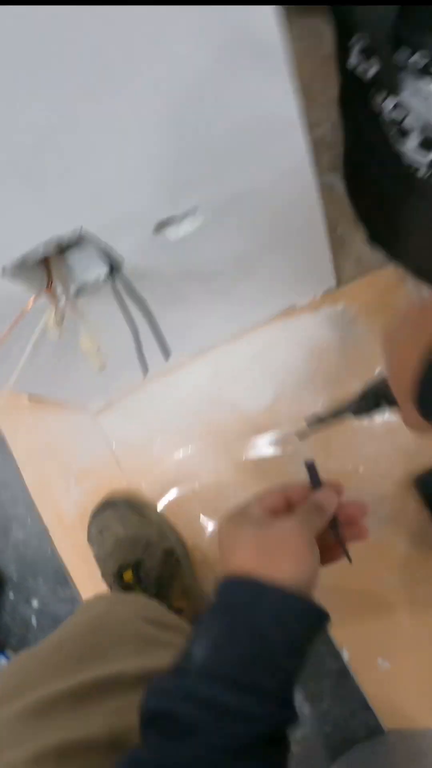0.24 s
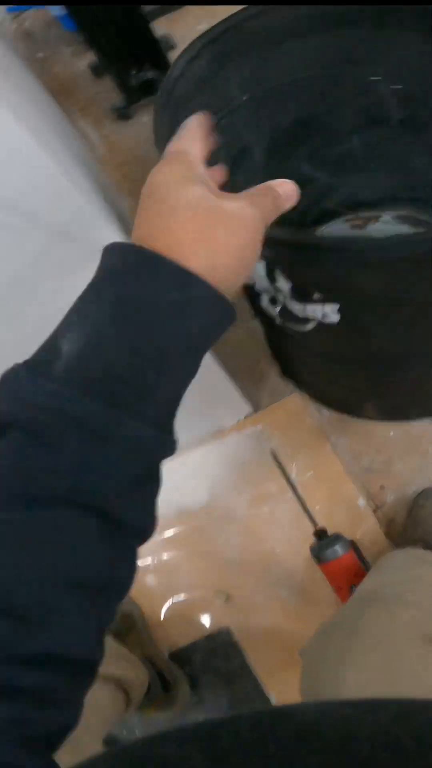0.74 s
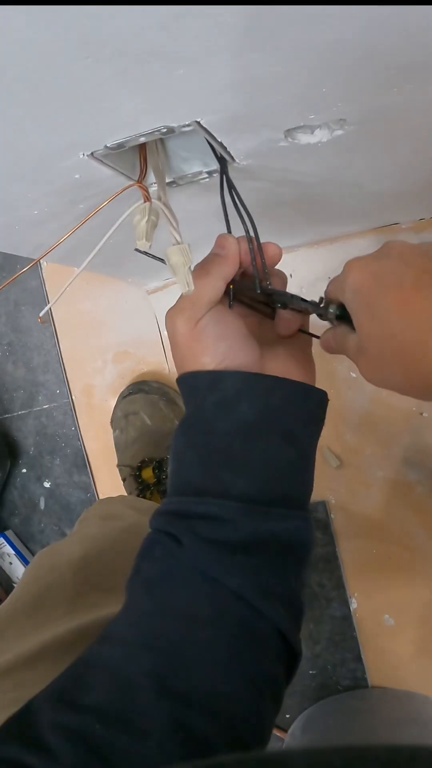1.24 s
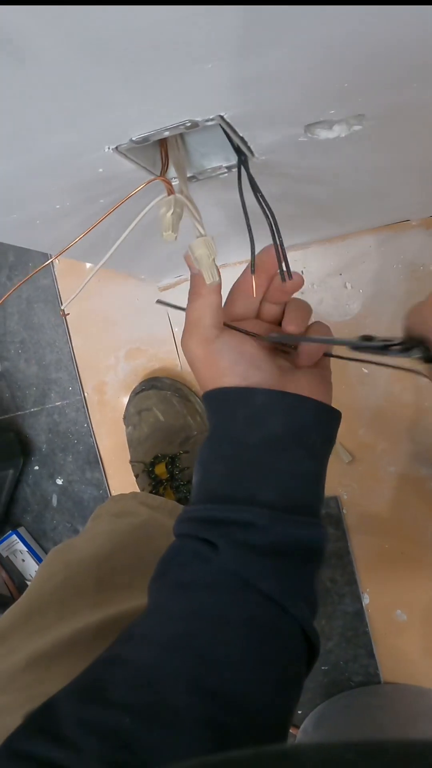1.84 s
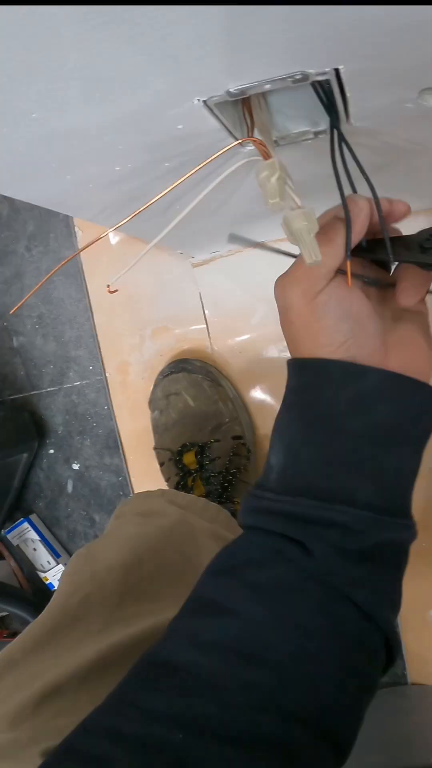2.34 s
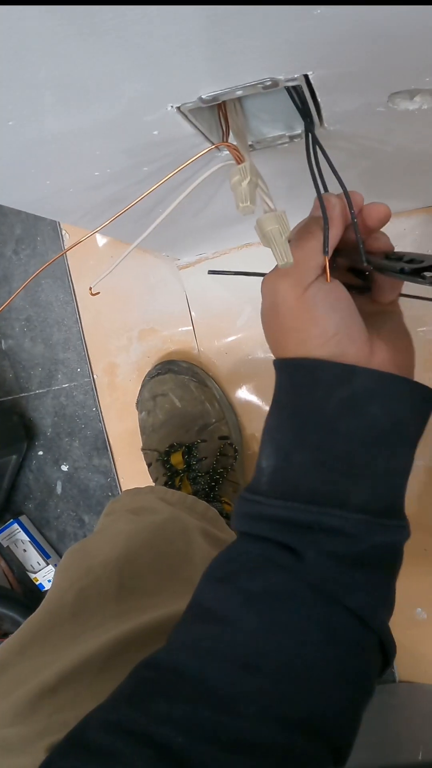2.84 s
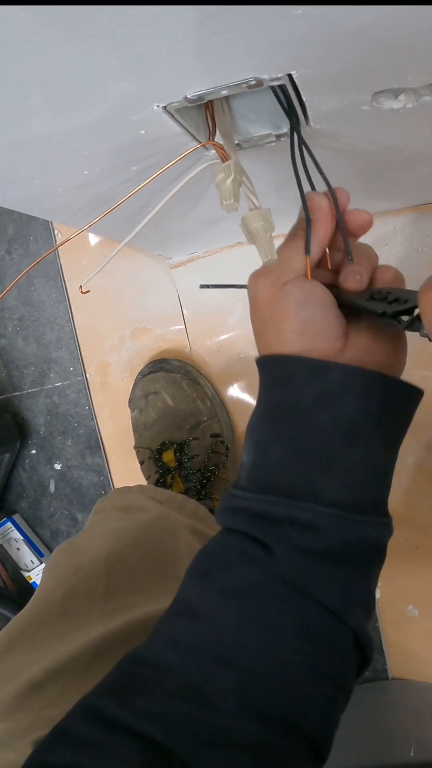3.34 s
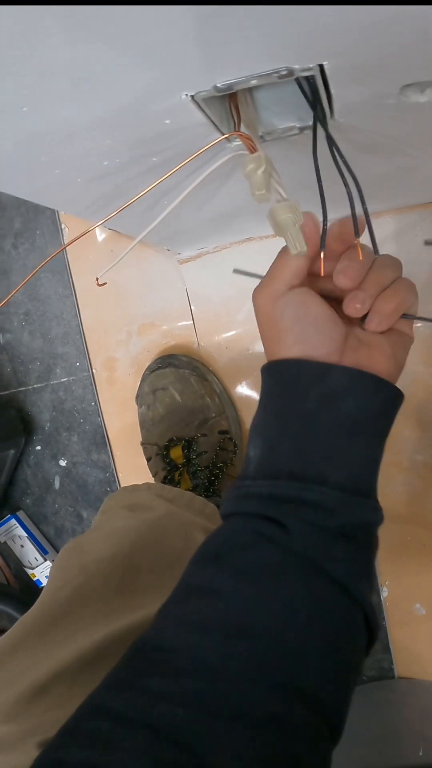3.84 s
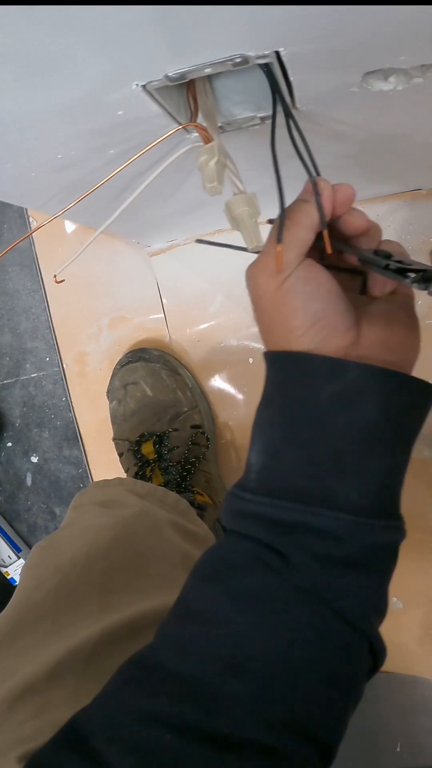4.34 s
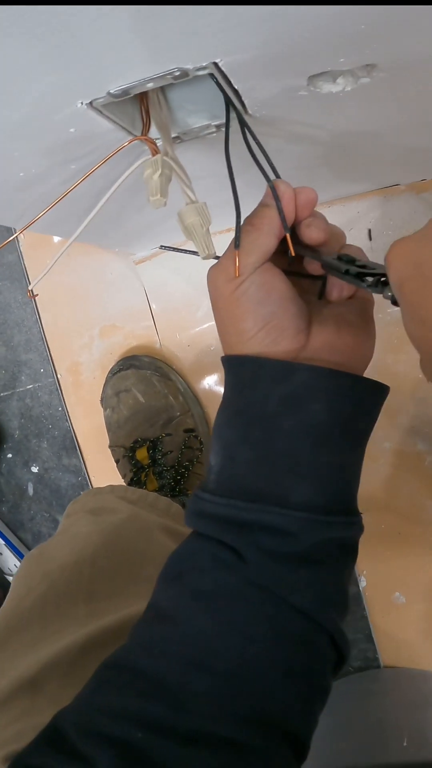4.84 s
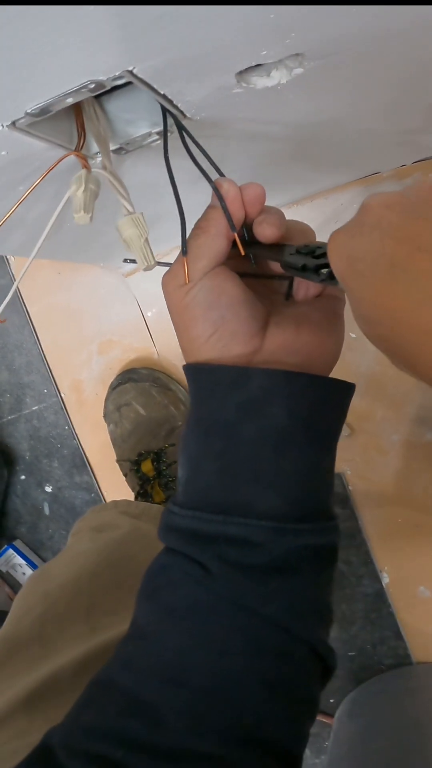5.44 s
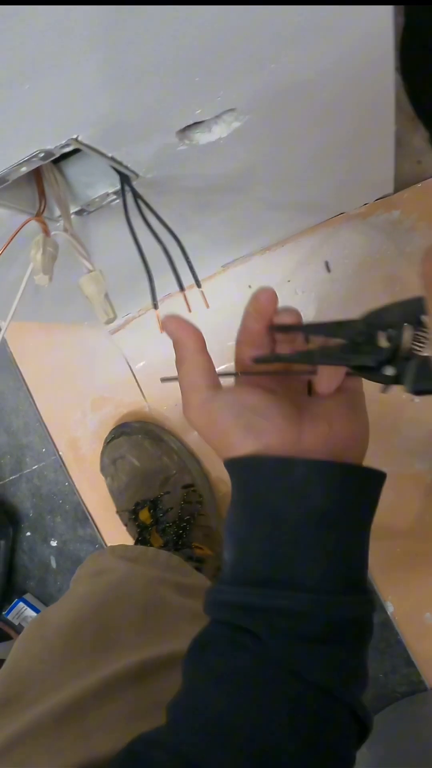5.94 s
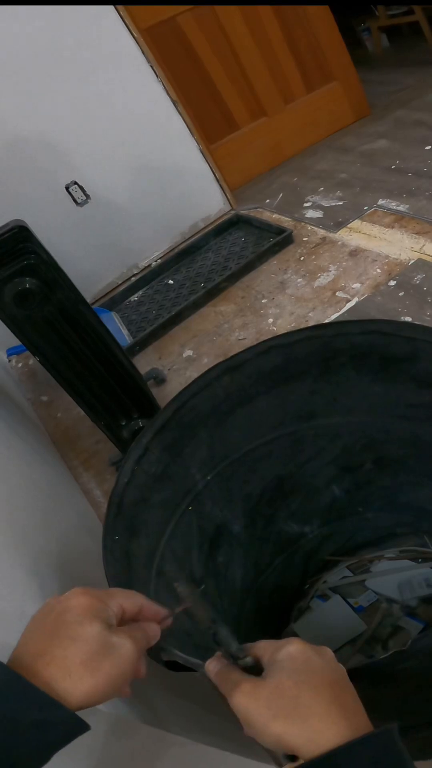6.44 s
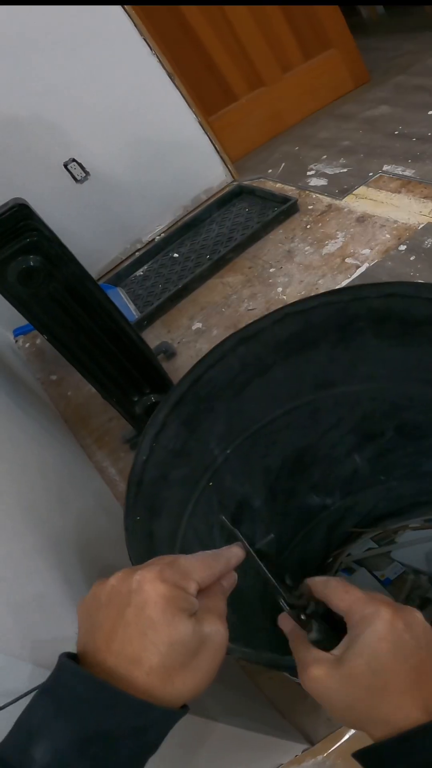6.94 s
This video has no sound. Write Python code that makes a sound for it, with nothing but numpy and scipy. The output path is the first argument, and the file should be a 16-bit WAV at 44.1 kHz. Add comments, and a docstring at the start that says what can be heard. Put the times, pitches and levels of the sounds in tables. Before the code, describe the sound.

Heard close up indoors, wire strippers cut and work stiff wire. One bright snip opens, then rustling and small clicks, a second snip with clacking handles, padded knocks, and a stronger third snip. Insulation ticks and parts with two brief snaps before a final ringing snip. Bare walls give each blow a lively echo until it suddenly vanishes; afterwards only quiet rubbing and sparse dry clicks remain.

```python
"""Wire strippers snip and strip insulated copper wire at a wall box, heard close up in a bare room.
A snip opens the scene, with two more near 1.6 and 3.4 s: noise cracks, a short jaw ring and a handle thump.
Throughout, filtered noise makes sleeves rustle and insulation scrape; taps and catches punctuate it.
Two dry snaps follow near 4.5 s and a last snip at 5.6 s; its room echo stops abruptly at 5.955 s.
Only close, dry handling and light clicks remain after that, over a quiet bed of air noise."""
import sys
import numpy as np
from scipy import signal
from scipy.fft import rfft, irfft, next_fast_len
from scipy.io import wavfile
from scipy.ndimage import uniform_filter1d, map_coordinates

SR = 44100
rng = np.random.default_rng(int(sys.argv[2]) if len(sys.argv) > 2 else 0)


def wav_out(sig):
    """Save sig, one row per channel (or a flat mono array), as 16-bit PCM at SR to the path in sys.argv[1]."""
    wavfile.write(sys.argv[1], SR, np.round(np.clip(np.atleast_2d(sig).T, -1, 1) * 32767).astype(np.int16))


N = 317462

# Spectral shape of soft, low cloth noise. Each row: frequency in Hz, relative level in dB.
SLEEVE_SPECTRUM = [(30, -45.5), (95, -33), (140, -7.5), (180, 3), (280, 0.5), (380, -9), (700, -21.5),
                   (1100, -8.5), (1600, -31), (5000, -74.5)]
# Spectral shape of insulation catching on steel. Each row: frequency in Hz, relative level in dB.
INSULATION_SPECTRUM = [(500, -18.5), (1500, 2.5), (2500, 1.5), (4500, -4.5), (7000, -7.5), (9000, -19.5),
                       (11000, -13.5), (14000, -24)]


def amp(db):
    """Decibels to gain."""
    return 10 ** (np.asarray(db) / 20)


def unit(x):
    """Scale to rms 1."""
    return x / np.sqrt(np.mean(x ** 2) + 1e-20)


def crest(x, size):
    """Scale so that the loudest stretch of size samples has rms 1."""
    return x / np.sqrt(uniform_filter1d(x ** 2, size).max() + 1e-20)


def along(points, hz):
    """Read (Hz, value) points on a log frequency axis."""
    f, v = np.transpose(points)
    return np.interp(np.log(hz + 1), np.log(f + 1), v)


def wobble(rate):
    """A smooth random curve with rate knots a second."""
    knots = rng.standard_normal(int(N * rate / SR) + 4)
    return map_coordinates(knots, [np.arange(N) * rate / SR])


def coloured(x, spectrum):
    """Causal (minimum-phase) filter with the given spectrum in dB."""
    n = x.shape[-1]
    m = 2 * next_fast_len(n // 2 + 2048)
    cepstrum = irfft(np.log(amp(along(spectrum, np.fft.rfftfreq(m, 1 / SR)))))
    # folding the cepstrum onto positive time gives minimum phase
    cepstrum[1:m // 2] *= 2
    cepstrum[m // 2 + 1:] = 0
    return irfft(rfft(x, m) * np.exp(rfft(cepstrum)), m)[..., :n]


def noise_in(spectrum):
    """Steady noise of rms 1 with the given spectral shape."""
    return unit(coloured(rng.standard_normal(N), spectrum))


def add(track, s, sound):
    """Mix a sound into the track at time s, in seconds."""
    part = track[max(round(s * SR), 0):][:len(sound)]
    part += sound[:len(part)]


def strike(t, attack, t60):
    """Envelope of a contact: force builds over the attack, then the vibration dies by 60 dB in t60."""
    rise = np.sin(np.pi / 2 * np.minimum(t / attack, 1)) ** 2
    return rise * amp(-60 * np.maximum(t - attack, 0) / t60)


def burst(t, attack, t60):
    """Noise under a contact envelope, as from a volley of tiny fractures."""
    return rng.standard_normal(len(t)) * strike(t, attack, t60)


def air(level_db=-57.5):
    """A low bed of noise whose level wanders slowly."""
    # Spectral shape of the air bed. Each row: frequency in Hz, relative level in dB.
    air_spectrum = [(25, -11.5), (45, -20.5), (100, -20.5), (150, -4.5), (200, -0.5), (280, -5), (400, -4),
                    (600, -3), (900, -11), (1300, -11.5), (2000, -12.5), (4000, -26), (7000, -35),
                    (11000, -36.5), (14000, -48.5)]
    return amp(level_db + 0.68 * wobble(1.2)) * noise_in(air_spectrum)


def handling(catch_rate=90, catch_db=-9, sleeve_flutter_db=1.5, scrape_flutter_db=2.5, scrape_gain_db=-2.0):
    """Sleeves rustle; fingers and steel rub the insulation with scattered tiny catches."""
    # Level points of continuous handling noise, in three lists that are joined.
    # Each row: time in seconds, sleeve level in dB before flutter,
    # scrape level in dB before flutter and scrape_gain_db.
    level_points = [
        [(0.9, -62.5, -59.5), (1.01, -55, -53.5), (1.16, -54.5, -52.5), (1.57, -50.5, -52), (2.01, -56, -63),
         (2.29, -59, -62), (2.43, -55, -56), (2.89, -57, -63), (3.32, -53, -57.5)],
        [(3.85, -57.5, -60), (4.088, -57.5, -59.5), (4.378, -55, -57), (4.55, -53.5, -52.5),
         (4.654, -54.5, -62.5), (5.026, -52, -59), (5.388, -56, -63.5), (5.56, -52.5, -66.5)],
        [(5.97, -53, -63.5), (6.028, -76, -66), (6.202, -65, -64), (6.458, -64.5, -63), (6.594, -66, -65),
         (6.724, -66, -74), (6.93, -65, -64), (7.122, -60, -59), (7.199, -68, -62)],
    ]
    # Spectral shape of the rubbing. Each row: frequency in Hz, relative level in dB.
    scrape_spectrum = [(150, -29.5), (450, 0), (800, 1.5), (1080, 4.5), (1500, 3.5), (2400, -0.5),
                       (4400, -5.5), (7000, -12), (9000, -22), (11000, -13.5), (13500, -26.5)]
    s, *levels = np.vstack(level_points).T
    sleeve_db, scrape_db = [np.interp(np.arange(N) / SR, s, level) for level in levels]
    sleeve = noise_in(SLEEVE_SPECTRUM) * amp(sleeve_db + sleeve_flutter_db * wobble(30))
    rub = noise_in(scrape_spectrum) * amp(scrape_flutter_db * wobble(29))
    # catch_rate is the average number of catches per second
    impulses = (rng.random(N) < catch_rate / SR) * rng.standard_normal(N)
    catches = unit(coloured(impulses, INSULATION_SPECTRUM))
    return sleeve + (rub + amp(catch_db) * catches) * amp(scrape_db + scrape_gain_db)


def swells(flutter_db=2):
    """Soft low noise swells and fades after the last three loud cracks."""
    # Soft swells. Each row: start in seconds, length in seconds, peak level in dB before flutter.
    swell_times = [(3.443, 0.38, -43), (4.557, .22, -48), (5.588, 0.33, -43.5)]
    level = np.zeros(N)
    for s, length, db in swell_times:
        add(level, s, amp(db) * signal.windows.hann(round(length * SR)))
    return level * amp(flutter_db * wobble(30)) * noise_in(SLEEVE_SPECTRUM)


def rustles(flutter_db=1.5, rise_s=.002):
    """Short rustles of rubbing noise start almost at once and die away unevenly."""
    # Short rustles. Each row: start in seconds, level in dB before flutter, 60 dB decay in seconds.
    rubs = [(0.993, -48, 0.88), (4.0, -54, .4), (1.19, -54.5, 0.71), (2.33, -58, .5), (3.14, -57, 0.69),
            (6.5, -60, 0.74), (6.92, -56, 1.5)]
    # Spectral shape of the rustle. Each row: frequency in Hz, relative level in dB.
    rustle_spectrum = [(200, -10), (600, -3), (1100, 0.5), (2500, -1), (4500, -1.5), (7000, -11.5),
                       (9000, -20.5), (11000, -17.5), (14000, -29.5)]
    level = np.zeros(N)
    t = np.arange(SR) / SR
    for s, db, t60 in rubs:
        add(level, s, amp(db) * strike(t, rise_s, t60))
    return level * amp(flutter_db * wobble(40)) * noise_in(rustle_spectrum)


def drags(jitter=0.097):
    """Insulation sticks and slips through the notch: quick decaying noise bursts make a thin buzz."""
    # The notch drags along the insulation.
    # Each row: start in seconds, end in seconds, mean slips per second, level in dB.
    strokes = [(3.265, 3.285, 260, -57.5), (4.956, 5.018, 210, -60)]
    buzz_spectrum = [(1500, -7), (4000, -4), (7000, 12), (9000, -20), (14000, -23)]  # (Hz, dB)
    out = np.zeros(N)
    for start, end, rate, db in strokes:
        n = round((end - start) * SR)
        phase = np.cumsum(rate * (1 + jitter * wobble(80)[:n])) / SR
        slips = rng.standard_normal(n) * np.exp(-6 * (phase % 1))
        buzz = unit(coloured(slips, buzz_spectrum)) * signal.windows.tukey(n)
        add(out, start, amp(db) * buzz)
    return out


def ticks(scatter_db=2.0, t60=0.0114):
    """During each pull the insulation catches on the steel with small dry ticks, unevenly spaced."""
    # The notch works along stiff insulation.
    # Each row: start in seconds, end in seconds, ticks per second, level in dB before random scatter.
    pulls = [(1.219, 1.56, 38, -47.5), (4.56, 4.97, 50, -52), (5.038, 5.12, 50, -48.5),
             (5.27, 5.41, 22, -52.5), (6.969, 7.1, 25, -53)]
    out = np.zeros(N)
    t = np.arange(SR // 30) / SR
    for start, end, rate, db in pulls:
        for s in np.arange(start, end, 1 / rate):
            tick = crest(coloured(burst(t, 0.00036, t60), INSULATION_SPECTRUM), size=88)
            tick_db = db + scatter_db * rng.standard_normal()
            add(out, s + rng.random() / rate, amp(tick_db) * tick)
    return out


def ringing(t, hz, attack, t60, waver=0.33):
    """One hand-damped mode; the grip shifts, so its phase drifts."""
    # waver is the rms phase drift in radians per square root of a millisecond
    drift = waver * np.cumsum(rng.standard_normal(len(t))) / np.sqrt(SR / 1000)
    return crest(np.sin(2 * np.pi * hz * t + drift) * strike(t, attack, t60), size=132)


def contact(hz, attack, t60, thump_db, ring_db, crack_db, tick_db,
            thump_t60=0.049, release=20, ring_life=1.77, ring_lag=0.0011):
    """One contact: a push on the handles, a short ring of the jaws, a crack and a bright tick."""
    # Spectral shape of hand and handles. Each row: frequency in Hz, relative level in dB.
    thump_spectrum = [(30, -47), (70, -29.5), (100, -21), (128, -7.5), (175, 5), (215, -6), (268, 1.5),
                      (370, -18.5), (650, -24), (1000, -44.5), (3000, -100)]
    # Spectral shape of the crack. Each row: frequency in Hz, relative level in dB.
    crack_spectrum = [(200, -56), (450, -21.5), (900, -4), (1400, -2), (2000, -0.5), (2800, -0.5),
                      (3400, -5), (4200, -7), (5500, -11.5), (9000, -52.5)]
    # Spectral shape of the bright tick. Each row: frequency in Hz, relative level in dB.
    tick_spectrum = [(2000, -49.5), (3800, -8), (5100, 3), (6500, 3), (8000, -5.5), (11000, -1.5),
                     (13000, -2.5), (15000, -22.5)]
    # Small steel parts radiate little bass. Each row: frequency in Hz, gain in dB.
    radiation = [(100, -25.5), (400, -9), (750, 0.5)]
    # Upper modes of the jaws, struck by each crack.
    # Each row: frequency in Hz, level in dB relative to the crack, decay as a multiple of t60.
    steel_modes = [(2841, -10.5, 1.3), (4057, -19, 1.4)]
    t = np.arange(SR // 10) / SR
    push = burst(t, attack, thump_t60)
    push[round(attack * SR / 2)] += release  # the grip suddenly gives
    thump = crest(coloured(push, thump_spectrum), size=264)
    ring = coloured(ringing(t, hz, attack + ring_lag, ring_life * t60), radiation)
    crack = crest(coloured(burst(t, attack, t60), crack_spectrum), size=88)
    for mode_hz, db, life in steel_modes:
        crack += amp(db) * ringing(t, mode_hz, attack, life * t60)
    tick = crest(coloured(burst(t, attack, t60), tick_spectrum), size=88)
    return amp(thump_db) * thump + amp(ring_db) * ring + amp(crack_db) * crack + amp(tick_db) * tick


# The blows below yield (seconds, sound, room send in dB); contacts() sets their common level.
def clicks(ring_hz=1180, send_db=-0.5):
    """Brief hard touches as the tool is set on the wire: mostly crack, with a tick of varying strength."""
    # Light touches. Each row: time in seconds, crack level in dB, tick level in dB.
    touches = [(.994, -41.5, -61), (1.428, -47, -58), (1.461, -44.5, -58), (2.292, -36, -33.5),
               (3.012, -64, -54.5), (3.992, -31, -31.5), (4.12, -49, -47.5), (4.589, -42, -54),
               (5.081, -47.5, -59), (4.501, -47, -47), (5.163, -45.5, -58), (6.011, -50, -50.5),
               (6.521, -50, -48.5), (6.919, -50, -50)]
    for s, crack_db, tick_db in touches:
        click = contact(ring_hz, attack=0.0016, t60=0.028, thump_db=crack_db - 6.5,
                        ring_db=crack_db - 14.5, crack_db=crack_db, tick_db=tick_db)
        yield s, click, send_db


def knocks():
    """Padded by the hand, the force builds slowly: ring and thump with little crack."""
    # The gripped tool knocks dully against hand and wire. Each row: time in seconds,
    # ring level in dB, ring frequency in Hz, thump level in dB, room send in dB.
    bumps = [(1.296, -38.5, 1090, -50, -9), (1.311, -38, 1085, -48, -10), (1.325, -48, 1013, -39, -4),
             (1.518, -42, 1040, -59, 4), (1.537, -59, 945, -36, 8.5), (1.588, -25, 583, -41, 0),
             (1.85, -30, 1030, -48.5, -3), (2.232, -46, 1090, -51, 12), (2.553, -36, 1138, -43.5, 3),
             (2.978, -45, 1150, -39.5, -13), (3.059, -67, 1010, -44.5, -5), (3.27, -47.5, 1192, -60, 10),
             (4.312, -31.5, 1103, -60, 3), (4.34, -45, 1059, -41, 6.5), (4.966, -54.5, 1076, -36, 3),
             (5.05, -49.5, 1040, -40.5, 4.5), (5.166, -52, 1064, -41, 0), (5.446, -50, 1020, -47, -3),
             (5.865, -33, 1069, -53, 9)]
    for s, ring_db, hz, thump_db, send_db in bumps:
        force_db = max(ring_db, thump_db)
        knock = contact(hz, attack=.0035, t60=0.024, thump_db=thump_db, ring_db=ring_db,
                        crack_db=force_db - 12.5, tick_db=force_db - 32.5)
        yield s, knock, send_db


def clacks(ring_hz=1070):
    """Handles spring back against a hard stop: crack and ring are set about equally strong."""
    # Handle stops. Each row: time in seconds, crack level in dB, thump level in dB, room send in dB.
    stops = [(.01, -34.5, -32.5, 12.5), (.115, -32.5, -32, 3), (1.171, -44.5, -51, -7),
             (1.578, -31, -54, -8), (1.606, -32.5, -37, -5), (2.864, -36, -47, 1.5),
             (3.548, -30.5, -42, -12), (3.568, -30.5, -38, -9), (3.582, -30, -33, -6), (5.88, -24, -34, -1),
             (5.9236, -26, -38.5, -1.5)]
    for s, db, thump_db, send_db in stops:
        clack = contact(ring_hz, attack=0.0019, t60=0.029, thump_db=thump_db,
                        ring_db=db - 0.5, crack_db=db, tick_db=db - 18)
        yield s, clack, send_db


def snaps(ring_hz=960, send_db=-1.5):
    """Insulation parts, very short and dry; the handles hardly move."""
    # Partings. Each row: time in seconds, crack level in dB, ring level in dB, before softening.
    partings = [(4.4509, -18.5, -15.5), (4.5456, -23, -30.5)]
    # Soft insulation gives less treble. Each row: frequency in Hz, gain in dB.
    softening = [(4300, 0), (6500, -5.5)]
    for s, crack_db, ring_db in partings:
        snap = contact(ring_hz, attack=.0004, t60=0.0086, thump_db=crack_db - 31,
                       ring_db=ring_db, crack_db=crack_db, tick_db=crack_db - 29.5)
        yield s, coloured(snap, softening), send_db


def snips(slam_s=.0024, rebound_s=0.017, rebound_db=-17):
    """The edges bite, the wire crunches and breaks, then the jaws slam shut and rebound once."""
    # The jaws cut through. Each row: time of the break in seconds, bite lead in seconds,
    # bite rise in seconds, bite ring level in dB, bite thump level in dB, crack level in dB,
    # tick level in dB, ring level in dB, ring frequency in Hz, thump level in dB, room send in dB.
    cuts = [(.057, 0.0032, 0.0016, -28, -24, -15.5, -7.5, -26, 1234, -14.5, 1.5),
            (1.585, .014, .008, -34, -49, -21, -29, -26.5, 1122, -38, -2.5),
            (3.354, .017, .0095, -16, -42, -15.5, -18.5, -18.5, 1084, -28, -2),
            (5.593, 0.018, .0025, -21.5, -25, -14.5, -25, -12.5, 1102, -25.5, -2)]
    for (s, lead, rise, bite_db, bite_thump_db, crack_db, tick_db,
         ring_db, hz, thump_db, send_db) in cuts:
        bite = contact(hz, attack=rise, t60=.012, thump_db=bite_thump_db,
                       ring_db=bite_db, crack_db=crack_db - 16, tick_db=tick_db - 17.5)
        crunch = contact(hz, attack=lead / 2, t60=.025, thump_db=bite_thump_db - 4,
                         ring_db=ring_db - 20, crack_db=crack_db - 12.5, tick_db=tick_db - 11.5)
        breaking = contact(hz, attack=.001, t60=.011, thump_db=thump_db - 8,
                           ring_db=ring_db - 4, crack_db=crack_db, tick_db=tick_db)
        slam = contact(hz, attack=.0022, t60=0.028, thump_db=thump_db,
                       ring_db=ring_db, crack_db=crack_db - 3.5, tick_db=tick_db - 12)
        rebound = contact(hz, attack=.0015, t60=.025, thump_db=thump_db + 2,
                          ring_db=ring_db, crack_db=crack_db - 2, tick_db=tick_db - 9.5)
        yield s - lead, bite, send_db + 3
        yield s - lead / 2, crunch, send_db - 3
        yield s, breaking, send_db
        yield s + slam_s, slam, send_db + 1.0
        yield s + rebound_s, amp(rebound_db) * rebound, send_db


def contacts(level_db=-1):
    """All blows of the tool, as direct sound and as room feed."""
    direct, feed = np.zeros(N), np.zeros(N)
    for kind in (snips, clacks, knocks, clicks, snaps):
        for s, sound, send_db in kind():
            add(direct, s, amp(level_db) * sound)
            add(feed, s, amp(level_db + send_db) * sound)
    return direct, feed


def room_tail(build=0.0053):
    """Hard bare walls: a diffuse noise tail that builds up and dies band by band."""
    # Decay of the bare room. Each row: frequency in Hz, 60 dB decay time in seconds.
    decay_times = [(100, 0.16), (220, 0.59), (500, 1.03), (1200, 1.21), (3000, 1.53), (6000, 1.39),
                   (8000, 0.98), (12000, 0.75)]
    # Spectral shape of the echo. Each row: frequency in Hz, relative level in dB.
    echo_spectrum = [(60, -11), (130, -0.5), (250, 4), (400, -1.5), (650, 1.5), (1100, -7.5), (1700, -3.5),
                     (3000, -6), (4200, -5.5), (5200, -9), (6700, -5), (8500, -9), (11000, -13),
                     (14000, -11.5)]
    hz, t, z = signal.stft(rng.standard_normal(SR), SR, nperseg=256)
    decay = amp(-60 * t / along(decay_times, hz)[:, None])
    tail = signal.istft(z * decay * (1 - np.exp(-t / build)), SR, nperseg=256)[1]
    return coloured(tail / np.linalg.norm(tail), echo_spectrum)


def room(feeds, room_db=-6):
    """The sound thrown in each direction meets its own walls; together they make a smooth echo."""
    echo = sum(signal.fftconvolve(feed, room_tail())[:N] for feed in feeds)
    return amp(room_db) * echo / np.sqrt(len(feeds))


def scene(count=3, echo_end_s=5.955):
    """All is close and central; the room echo stops abruptly while the direct sounds go on."""
    # Treble balance of the left port. Each row: frequency in Hz, gain in dB.
    left_port = [(10500, 0), (13000, -4)]
    # the tool radiates differently each way: one direction is heard directly, all feed the room
    directs, feeds = zip(*[contacts() for _ in range(count)])
    echo = room(feeds) * (np.arange(N) / SR < echo_end_s)
    mono = air() + handling() + swells() + rustles() + drags() + ticks() + directs[0] + echo
    return np.array([coloured(mono, left_port), mono])


def record(dry, top_hz=14400):
    """Microphone ports notch the treble and part in phase; peaks clip before a steep treble limit."""
    # Response of the microphone. Each row: frequency in Hz, gain in dB.
    microphone = [(20, 1), (8200, -0.5), (8800, -8.5), (9150, -12), (9600, -7.5), (10600, 0), (14000, -14)]
    # Phase difference between the ports. Each row: frequency in Hz, phase in radians.
    port_phase = [(1000, 0), (2500, .08), (6000, .14), (10500, 0.31), (12200, 1.0)]
    x = np.clip(coloured(dry, microphone), -1, 1)
    m = next_fast_len(N + SR // 4)
    hz = np.fft.rfftfreq(m, 1 / SR)
    # half of the phase difference goes each way
    ports = np.exp(.5j * np.outer([1, -1], along(port_phase, hz)))
    return irfft(rfft(x, m) * ports * (hz < top_hz), m)[:, :N]


dry = scene()
out = record(dry)
wav_out(out)
```